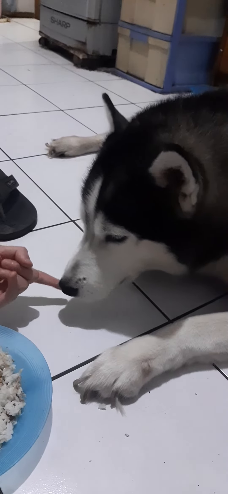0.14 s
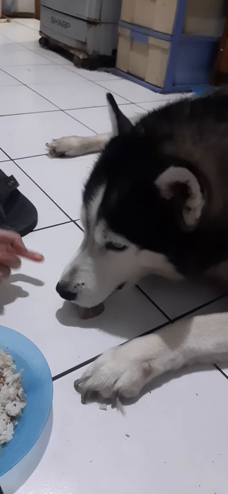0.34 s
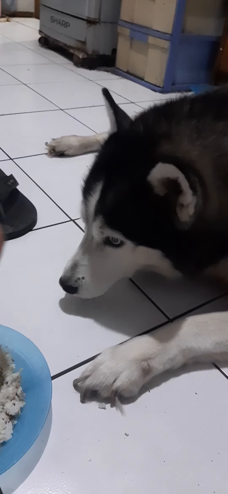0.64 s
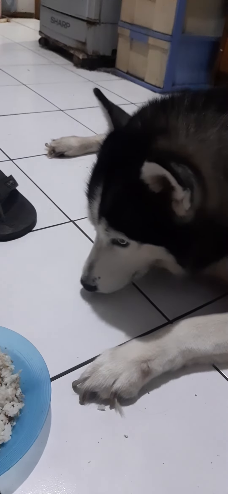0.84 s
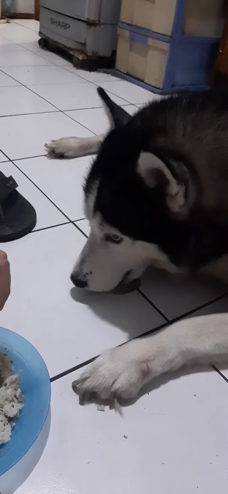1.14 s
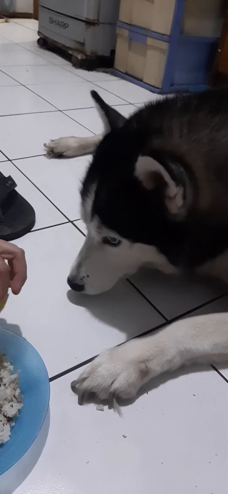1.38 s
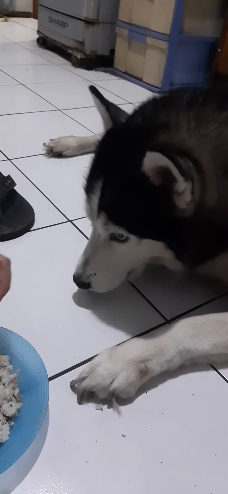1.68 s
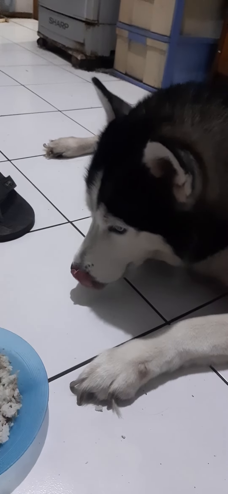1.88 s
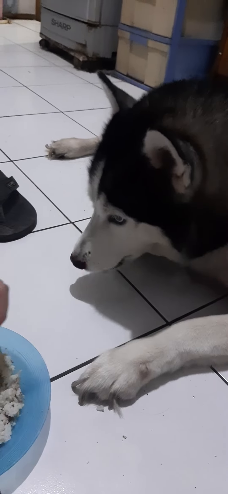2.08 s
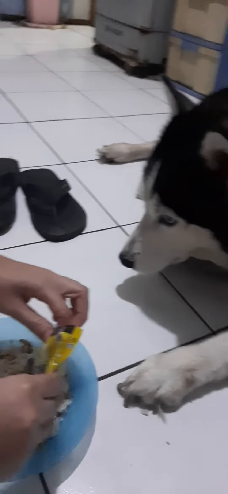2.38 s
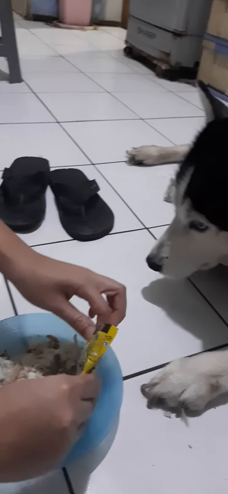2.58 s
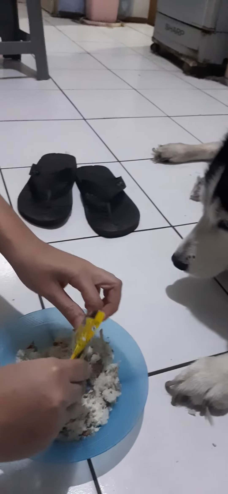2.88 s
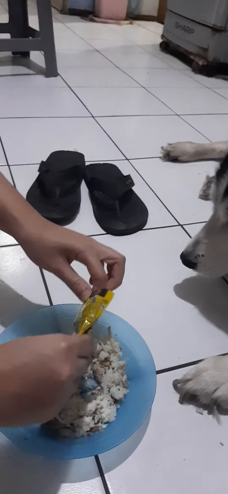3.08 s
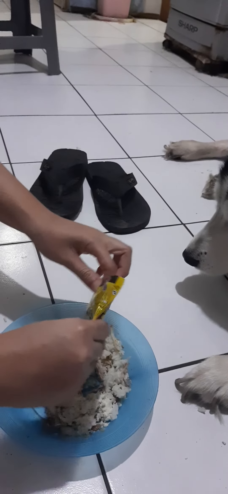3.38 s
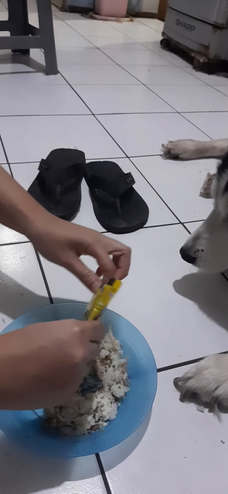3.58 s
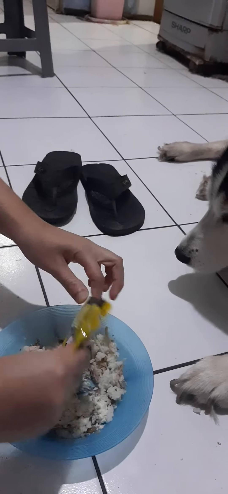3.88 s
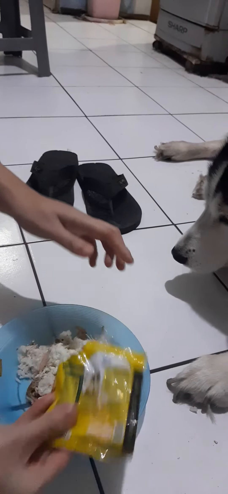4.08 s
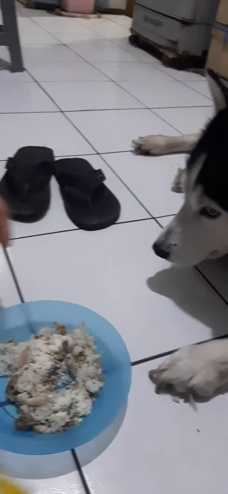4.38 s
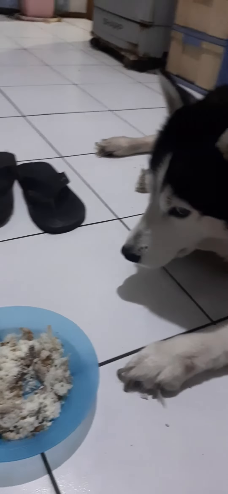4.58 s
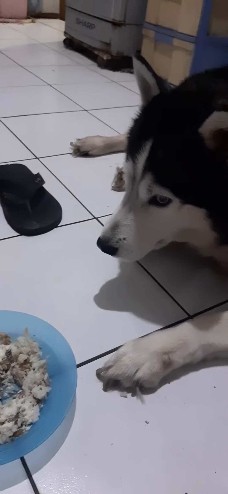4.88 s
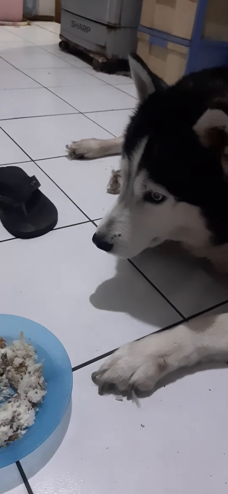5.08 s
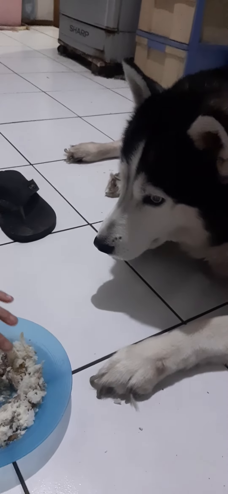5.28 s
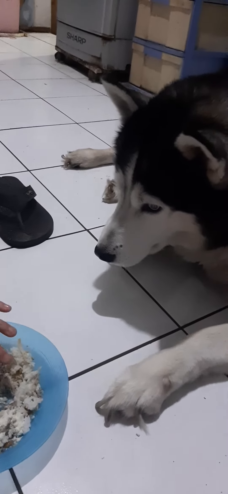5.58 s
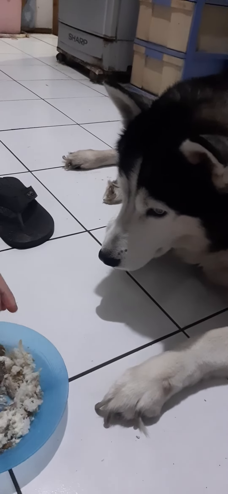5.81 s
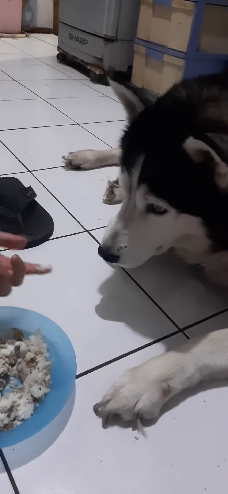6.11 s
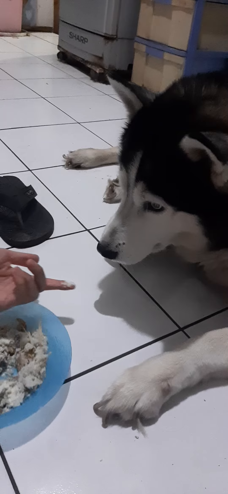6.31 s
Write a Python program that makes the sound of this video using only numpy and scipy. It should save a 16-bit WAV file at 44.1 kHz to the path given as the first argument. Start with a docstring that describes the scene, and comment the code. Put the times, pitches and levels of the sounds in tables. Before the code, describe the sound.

A small plastic sachet crackles and snaps as fingers tear and squeeze it, over a faint appliance hum indoors.

```python
"""Squeezing out a sachet

A small plastic sachet is torn open and squeezed over a bowl, close to a phone in a tiled room.
Each crease that buckles gives a short snap, finer crackle runs between, and the room smears both.
A sleeve rustles softly, most of all as an arm moves past near the end. Underneath, an appliance
hums and the hand holding the phone adds a low rumble."""
import sys
import numpy as np
from scipy import signal
from scipy.fft import rfft, irfft, next_fast_len
from scipy.io import wavfile
from scipy.ndimage import uniform_filter1d

SR = 44100
rng = np.random.default_rng(int(sys.argv[2]) if len(sys.argv) > 2 else 0)


def generate_wav(signal):
    """Clip the signal to [-1, 1] and save it as 16-bit WAV at the path in sys.argv[1]."""
    frames = np.transpose(np.atleast_2d(signal))
    scaled = np.clip(frames, -1, 1) * 32767
    pcm = np.round(scaled).astype(np.int16)
    wavfile.write(sys.argv[1], SR, pcm)


N = 284445
TIME = np.arange(N) / SR
TOP_HZ = 16000

# Buckling creases. Each row: start in seconds, relative level in dB, flip time in seconds,
# ring pitch in Hz, then fizz and low knock in dB, both relative to the snap.
CREASE_SNAPS = [(0.5539, -56.5, 0.0017, 3770, -6, -3), (0.572, -58, 0.0032, 2510, -6, 4.5),
                (0.59, -55.5, 0.0021, 2590, -4, -12), (0.7158, -59, 0.0024, 2200, -1, 0),
                (0.7472, -47.5, 0.0027, 5100, -5.5, -7), (0.8994, -43, 0.0017, 2320, 2.5, -4),
                (1.057, -47.5, 0.0022, 4400, -2, -15), (1.0968, -40.5, 0.0067, 2300, -5.5, -4.5),
                (1.161, -44.5, 0.0067, 2360, -7.5, -12), (1.1694, -43.5, 0.003, 1650, -14, -13),
                (1.2128, -49, 0.0027, 2860, -14, -17), (1.227, -39.5, 0.0044, 2260, -3, -14),
                (1.4309, -44.5, 0.0033, 2400, -11, -7), (1.4496, -44, 0.0033, 3800, -11, -16),
                (1.4613, -45, 0.0041, 3840, -4.5, -1.5), (1.4817, -47, 0.0025, 2000, -5, -13),
                (1.5412, -48.5, 0.0029, 2260, -13, -6), (1.576, -45.5, 0.0033, 2180, -32, 0),
                (1.5856, -48.5, 0.0061, 1770, -4, -4), (1.6424, -45.5, 0.0034, 1370, -18, -1),
                (1.6529, -52.5, 0.0017, 5190, -2, -2), (1.6853, -45, 0.0028, 1610, -13, -23),
                (1.7066, -43.5, 0.0022, 2090, -12, -4), (1.7374, -43, 0.0048, 1810, -6, -18),
                (1.7519, -38.5, 0.0062, 2100, -3, -3.5), (1.836, -45, 0.0041, 2480, -2.5, -2),
                (1.9048, -48.0, 0.003, 1770, -6, -7), (1.9334, -50.5, 0.0036, 2190, -2.5, -2.5),
                (2.0059, -47.5, 0.0025, 2200, -5, -8), (2.0967, -46.5, 0.0046, 2060, -4, -5),
                (2.2613, -43, 0.0037, 4300, 2.5, -6.5), (2.3232, -50, 0.0032, 4170, -3, -15),
                (2.3905, -46, 0.0019, 2080, -8, -17), (2.4358, -40, 0.0051, 2040, -2.5, -13),
                (2.4437, -41.5, 0.0047, 2780, -9, -19), (2.4616, -43.5, 0.0048, 3760, -6, -5.5),
                (2.507, -45, 0.003, 4720, -10, -7), (2.5217, -47.5, 0.0068, 2030, -5, -2),
                (2.5492, -51, 0.0028, 4070, 2.5, -5), (2.5973, -40, 0.0064, 4750, -0.5, -9),
                (2.6138, -45, 0.0074, 2030, -5, -1), (2.6843, -45, 0.0034, 3850, -5, -4),
                (2.728, -40, 0.0036, 1960, -10, -19), (2.7697, -46.5, 0.0022, 2080, -23, -8),
                (2.7823, -50.5, 0.0025, 1060, -17, 7), (2.802, -47.5, 0.0019, 4110, -7, -11),
                (2.8189, -43.5, 0.0055, 4180, -6, -9), (2.824, -45.0, 0.003, 4300, 1.5, -15),
                (2.8858, -46.5, 0.0036, 3230, -7, -10), (2.9878, -49.5, 0.0027, 2110, -25, 0),
                (3.0642, -48.5, 0.0039, 5000, -1, -6), (3.1532, -46.5, 0.0033, 2270, -9, -8),
                (3.2088, -45.5, 0.0019, 2340, 1.5, -5), (3.2137, -44.5, 0.0022, 4270, 2.5, -12),
                (3.246, -44.5, 0.0026, 2140, -22, -10), (3.3374, -50.5, 0.0084, 3170, -7, -1.5),
                (3.3645, -49.5, 0.0028, 2320, -11, -10), (3.3924, -47.5, 0.0026, 2220, -24, -5),
                (3.502, -47.5, 0.0051, 2140, -8, -14), (3.5636, -39.5, 0.0046, 2120, -16, -9.5),
                (3.5898, -46, 0.004, 2320, -8, -8), (3.601, -39.0, 0.0043, 2300, -3, -0.5),
                (3.6068, -36.5, 0.0043, 2170, -13, -22), (3.6138, -35, 0.0027, 2240, -1.5, -9),
                (3.6199, -33, 0.0046, 2230, -2, -4), (3.6767, -37, 0.003, 2190, -6, -6),
                (3.7135, -31.5, 0.0024, 5000, -3, -6), (3.7138, -33.5, 0.0055, 2220, -3.5, -5.5),
                (3.7994, -41, 0.0034, 2000, -4.5, -10), (3.8081, -43, 0.0061, 2190, -9, -4),
                (3.819, -43, 0.0051, 2550, -3, -0.5), (3.832, -41.5, 0.0031, 2150, -8, -12),
                (3.9501, -49, 0.002, 2200, -5.5, 2), (4.1701, -51.5, 0.0027, 4800, 3, -1),
                (4.2033, -48.5, 0.0014, 4110, 2.5, -5), (4.5183, -50, 0.0024, 4060, -6.5, -7),
                (4.6225, -44.5, 0.0035, 1890, -3, -8), (4.659, -40.5, 0.0018, 4200, -18, -16),
                (4.6671, -40.5, 0.003, 2050, -8, -4), (4.6859, -34.5, 0.0039, 2700, -9, -13),
                (4.6924, -44.5, 0.0047, 1920, -5, -9)]
# Fingers kneading the film. Each row: time in seconds, relative crackle level in dB.
KNEADING = [(1.04, -61.5), (1.17, -54.5), (1.33, -60), (1.44, -53), (1.53, -59), (1.75, -54.5),
            (1.97, -59.5), (2.18, -53), (2.78, -53.5), (2.93, -62), (3.06, -52), (3.36, -52), (3.54, -58),
            (3.66, -45), (3.83, -54.5), (4.05, -69), (4.16, -60.5), (4.4, -74), (4.68, -51), (4.8, -65)]
# Arm moves. Each row: fastest moment in seconds, level in dB, half length in seconds,
# swish in dB relative to the rub.
ARM_SWEEPS = [(0.585, -64, 0.033, 4), (0.95, -66.5, 0.23, -1), (4.18, -70.5, 0.16, 0),
              (5.18, -64.5, 0.5, -16), (5.07, -70.5, 0.25, 5), (4.7, -71, .025, -12),
              (6.094, -56, 0.21, -2), (6.08, -57, 0.035, -12), (6.213, -58, 0.025, -18),
              (6.314, -57.5, 0.085, 1.5)]
# The hand shifting its grip. Each row: peak in seconds, level in dB, half length in seconds.
GRIP_SHIFTS = [(.72, -57, 0.32), (1.74, -51.5, 0.06), (2.3, -54, 0.23), (3, -57.5, 0.1),
               (6.33, -49.5, 0.29)]
# The appliance's hum. Each row: pitch in Hz, level in dB.
HUM_TONES = [(100.5, -67.5), (200, -68.5), (491, -74.5)]
# Cabinet resonances stirred by rushing air. Each row: centre in Hz, width in Hz, level in dB.
CABINET_MODES = [(136.2, 60, -60), (275.7, 20, -62), (309.2, 27.2, -57.5), (361.2, 14.6, -61),
                 (1292, 98, -69), (2553, 120, -76)]
# Tone curves of the noise layers and the two microphone ports. Each row: frequency in Hz, gain in dB.
FILM_EQ = [(350, -24), (600, 0), (1100, -1.5), (2100, -1.5), (3100, -3.5), (4800, -5), (7000, -9),
           (11000, -8.5), (15500, -12.5)]
RUB_EQ = [(300, -8), (600, -1), (1350, -2.5), (1850, 0), (2550, -7), (4500, -13), (8000, -22), (15500, -33)]
SWISH_EQ = [(700, -19), (3000, 3), (5000, 1), (8000, -2.5), (11000, 1), (15000, 0)]
GRIP_EQ = [(25, -36), (45, 0.5), (100, 8.5), (150, 3.5), (250, -8), (600, -26.5)]
AIR_EQ = [(30, -70), (50, -6), (130, -25.5), (220, -7), (400, -6.5), (620, -7), (900, -19), (1650, -22),
          (2550, -21), (3050, -30), (4000, -26), (8000, -36), (15500, -70)]
LEFT_EQ = [(500, 1.5), (1000, 2), (1600, 4), (2100, 2), (2700, 3.5), (5000, 3), (7300, 5), (8500, 3.5),
           (15000, -1.5)]
RIGHT_EQ = [(500, -2.5), (1100, 1.5), (1850, 3.5), (2250, 7), (2700, 2), (4600, 4), (6500, 2.5),
            (7600, 6.5), (8600, -2.5), (12000, 0), (15000, -1.5)]
# Stereo image of diffuse sound. Each row: frequency in Hz, correlation between left and right.
PORT_CORRELATION = [(60, 0.9), (250, 0.86), (700, 0.72), (1300, 0.038), (2300, 0.17), (4400, 0)]


def snap(flip_s, ring_hz, knock_db, fizz_db, ring_db, crack=3.9, lag_s=.0003, creak_s=.004):
    """One crease flips, in the middle of the window: the film creaks, cracks and flutters for a few ms."""
    t = np.arange(-1024, 1024) / SR
    flutter = diffuse(len(t))
    for port, late_s in enumerate(lag_s * rng.random(2)):
        flutter[port, len(t) // 2 + int(late_s * SR)] += crack
    # tiny slips build up before a slow crease gives way; a quick one snaps clean
    slips = np.repeat(np.minimum(rng.exponential(size=len(t) // 32), 3), 32)
    slowness = min((flip_s / .0016) ** 3, 2)
    creak = (t < 0) * slips * np.exp(-abs(t) / creak_s) * undb(-22) * slowness
    burst = flutter * (creak + (t >= 0) * np.exp(-(t / (1.3 * flip_s)) ** 2))
    spray = flutter * (creak + (t >= 0) * np.exp(-abs(t / flip_s) ** 1.3))
    # a soft pocket with little fizz is mostly ring; a taut crease is mostly crack
    hollow_db = ring_db - .7 * max(fizz_db, -20)
    ring = undb(hollow_db) * np.sqrt(2500 / ring_hz) * unit(film_ring(burst, ring_hz))
    core = unit(unit(band(burst, 1280, 6000)) + ring)
    knock = unit(band(burst, 506, 1300))
    # every facet of the film has a high ring of its own
    facet = film_ring(spray, rng.uniform(5100, 21000))
    fizz = unit(unit(band(spray, 7700, 15400)) + 0.071 * unit(facet))
    return core + undb(knock_db) * knock + pan(undb(fizz_db) * fizz, rng.normal(0, 3.9))


def creases(trim_db=-9.0, fizz_lift_db=1, usual_snap_db=-44):
    """The sachet's distinct snaps; strong ones shake the whole pouch, so they carry more ring."""
    out = np.zeros((2, N + SR))
    for start_s, db, flip_s, ring_hz, fizz_db, knock_db in CREASE_SNAPS:
        ring_db = -2.5 + .3 * max(db - usual_snap_db, 0)
        sound = snap(flip_s, ring_hz, knock_db, fizz_db + fizz_lift_db, ring_db)
        start = int(start_s * SR) - sound.shape[1] // 2
        out[:, start:start + sound.shape[1]] += undb(db + trim_db) * sound
    return out[:, :N]


def crackle(wrinkles_per_s=205, spread_db=3.1, clump_db=2, fade_s=0.0042, patches=24, trim_db=-0.74):
    """Tiny wrinkles give way in clumps; each patch of film has its own short tick and pitch."""
    t = np.arange(512) / SR
    kneading = (TIME > KNEADING[0][0]) * (TIME < KNEADING[-1][0])
    effort = undb(np.interp(TIME, *np.transpose(KNEADING)) + clump_db * drift(45)) * kneading
    out, power = 0, 0
    for ring_hz in np.geomspace(1400, 2900, patches):
        strength = undb(spread_db * np.minimum(rng.exponential(size=N), 3))
        ticks = strength * (rng.random(N) < wrinkles_per_s / patches / SR)
        patch = colour(diffuse(len(t)) * np.exp(-(t / fade_s) ** 2), FILM_EQ)
        patch = unit(unit(patch) + 0.29 * unit(film_ring(patch, ring_hz)))
        out = out + signal.fftconvolve((ticks * effort)[None], patch)[:, :N]
        power += np.mean(ticks ** 2) * len(t)
    return undb(trim_db) * out / np.sqrt(power)


def film_ring(x, hz):
    """One resonance of the film: wide hollow pockets ring low and long, small facets high and briefly."""
    q = 1 / np.clip(.12 * hz / 2000, .12, .22)
    return signal.lfilter(*signal.iirpeak(min(hz, SR / 2 - 2000), q, SR), x)


def room(x, split_hz=5000, low_t60_s=.24, high_t60_s=.29, near_db=-3.5, wet_db=-9.1):
    """Floor and bowl scatter a little at once; after 10 ms the furniture and walls return a dense tail."""
    t = np.arange(SR * 3 // 4) / SR
    onset = np.interp(t, [.002, .004, .008, .011], [0, undb(near_db), undb(near_db), 1])
    low = band(diffuse(len(t)), 230, split_hz) * undb(-60 * t / low_t60_s)
    high = band(diffuse(len(t)), split_hz, TOP_HZ + 2000) * undb(-60 * t / high_t60_s - 4)
    tail = (low + high) * onset
    tail /= np.sqrt(np.sum(tail ** 2) / 2)
    return undb(wet_db) * signal.fftconvolve(x, tail, axes=1)[:, :N]


def arm(grain_db=1.4, waver_db=0.36):
    """Cloth slides in smooth swells: a soft rub of the folds, and a bright swish where the weave skims."""
    rub = noise(RUB_EQ) * swells([(s, db, half_s) for s, db, half_s, _ in ARM_SWEEPS])
    skims = [(s, db + swish_db, half_s) for s, db, half_s, swish_db in ARM_SWEEPS]
    swish = noise(SWISH_EQ) * swells(skims)
    return (rub + swish) * undb(grain_db * drift(150) + waver_db * drift(22))


def appliance(air_db=-57.0, waver=0.46):
    """A bed of air, a rush that sets the cabinet droning, and a wavering hum with its bass to the left."""
    air = undb(air_db + 0.16 * drift(6.1)) * noise(AIR_EQ)
    rush = diffuse(N)
    drone = sum(undb(db) * unit(band(rush, hz - width / 2, hz + width / 2, order=2))
                for hz, width, db in CABINET_MODES)
    tones = []
    for hz, db in HUM_TONES:
        phase = 2 * np.pi * hz * TIME + 1.15 * drift(9)
        tones.append(undb(db) * np.sqrt(2) * np.sin(phase) * (1 + waver * drift(12)))
    return air + drone + pan(tones[0], left_db=17) + sum(tones[1:])


def grip(rest_db=-65, wander_db=5):
    """The hand rumbles on the phone, faintly at rest and swelling when it shifts."""
    rumble = noise(GRIP_EQ)
    resting = undb(rest_db + wander_db * drift(4.67))
    return pan(rumble * np.hypot(resting, swells(GRIP_SHIFTS)), left_db=4.2)


def undb(db):
    """Decibels to gain."""
    return 10 ** (np.asarray(db) / 20)


def unit(x):
    """Scale to rms 1."""
    return x / np.sqrt(np.mean(x ** 2))


def on_bins(rows, size):
    """Read a frequency curve at every Fourier bin."""
    hz, value = np.transpose(rows)
    return np.interp(np.log(np.fft.rfftfreq(size, 1 / SR) + 1), np.log(hz), value)


def colour(x, eq):
    """Minimum-phase EQ, so attacks stay sharp."""
    size = 2 * next_fast_len(x.shape[-1] // 2 + 2048)
    cepstrum = irfft(np.log(undb(on_bins(eq, size))))
    cepstrum[1:size // 2] *= 2
    cepstrum[size // 2 + 1:] = 0
    return irfft(rfft(x, size) * np.exp(rfft(cepstrum)))[..., :x.shape[-1]]


def band(x, low_hz, high_hz, order=3):
    """Band-pass."""
    return signal.sosfilt(signal.butter(order, [low_hz, high_hz], "band", fs=SR, output="sos"), x)


def diffuse(size):
    """Stereo noise: narrow in the bass, wide in the treble."""
    alike = on_bins(PORT_CORRELATION, size)
    mid, side = rfft(rng.standard_normal((2, size))) * np.sqrt([(1 + alike) / 2, (1 - alike) / 2])
    return irfft([mid + side, mid - side], size)


def noise(eq):
    """A bed of coloured stereo noise at rms 1."""
    return unit(colour(diffuse(N), eq))


def drift(rate_hz):
    """Smooth random modulation at rms 1."""
    hold = int(SR / rate_hz)
    steps = np.repeat(rng.standard_normal(N // hold + 2), hold)
    return unit(uniform_filter1d(uniform_filter1d(steps, hold), hold)[:N])


def swells(rows):
    """Bell-shaped fades for moves that speed up and slow down; their powers add."""
    return np.sqrt(sum((undb(db) * np.exp(-.5 * ((TIME - s) / half_s) ** 2)) ** 2 for s, db, half_s in rows))


def pan(x, left_db):
    """Lean a sound to the left."""
    return x * undb([[left_db / 2], [-left_db / 2]])


def scene():
    """Sachet, room and arm, coloured by the two ports, over the appliance and the hand's rumble."""
    sachet = creases() + crackle()
    left, right = sachet + room(sachet) + arm()
    return np.array([colour(left, LEFT_EQ), colour(right, RIGHT_EQ)]) + appliance() + grip()


def record(dry):
    """The phone cuts the top end steeply."""
    return signal.sosfilt(signal.ellip(10, .2, 70, TOP_HZ, fs=SR, output="sos"), dry)


dry = scene()
out = record(dry)
generate_wav(out)
```